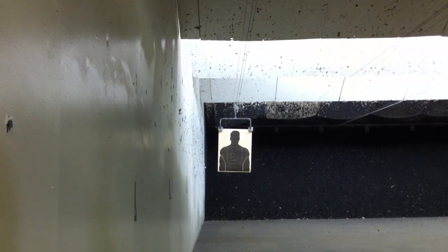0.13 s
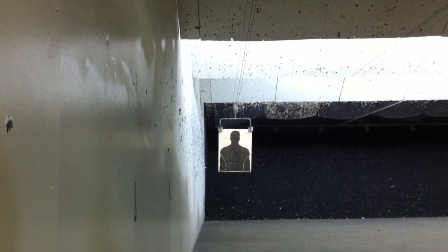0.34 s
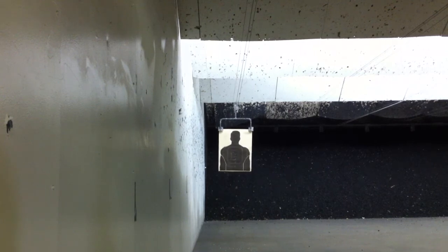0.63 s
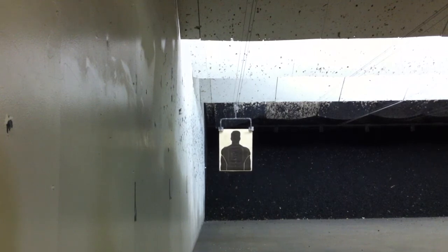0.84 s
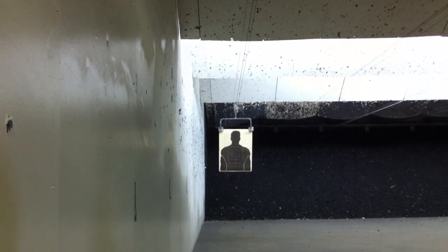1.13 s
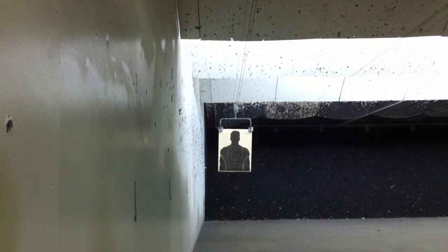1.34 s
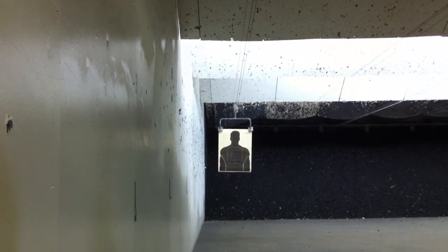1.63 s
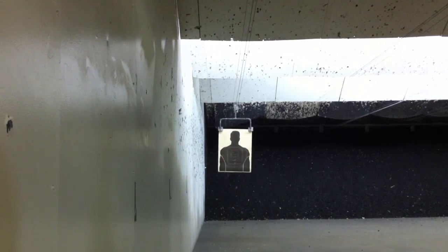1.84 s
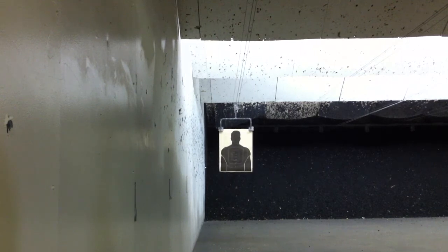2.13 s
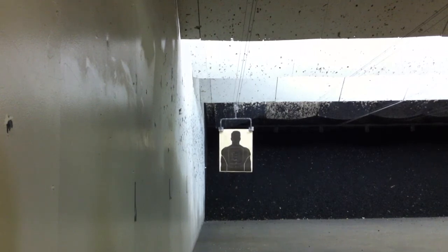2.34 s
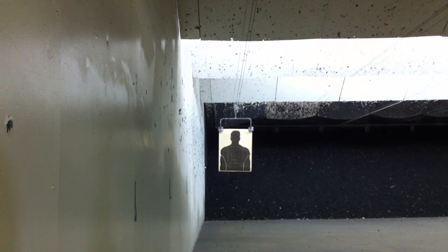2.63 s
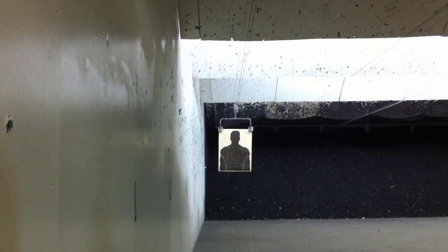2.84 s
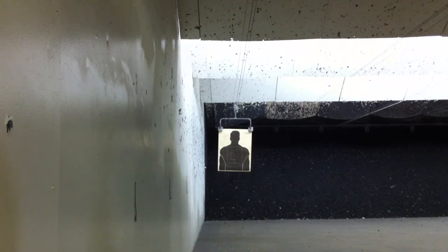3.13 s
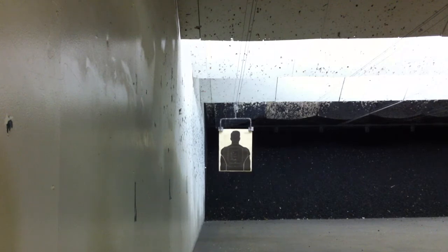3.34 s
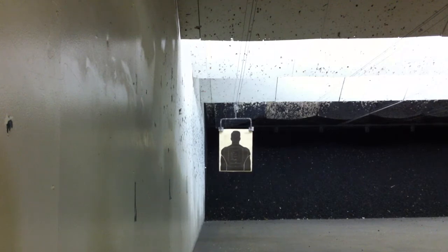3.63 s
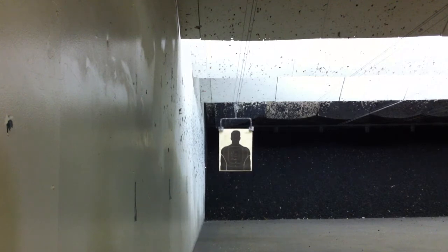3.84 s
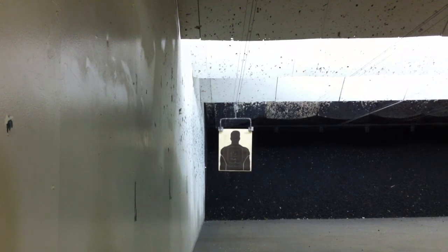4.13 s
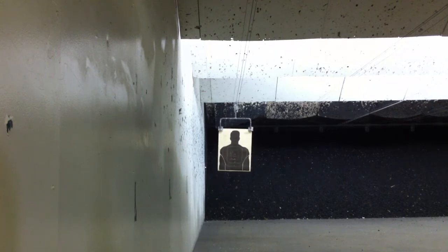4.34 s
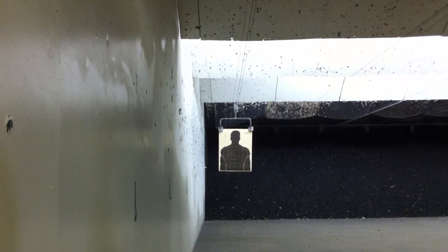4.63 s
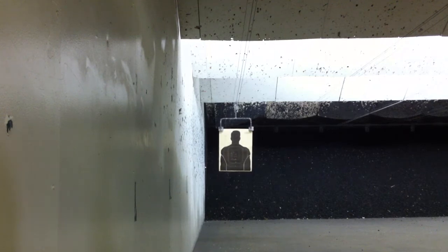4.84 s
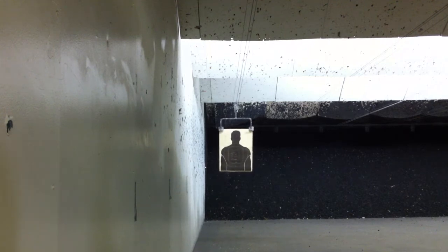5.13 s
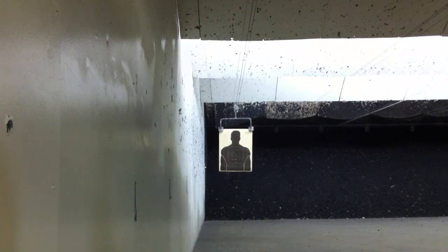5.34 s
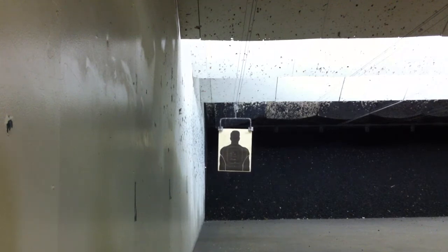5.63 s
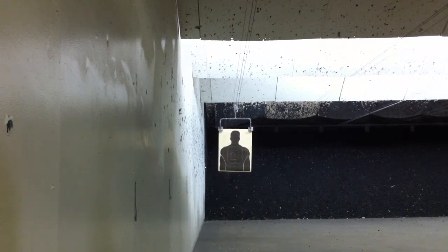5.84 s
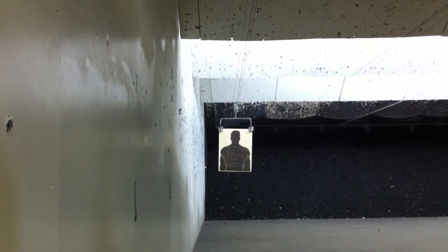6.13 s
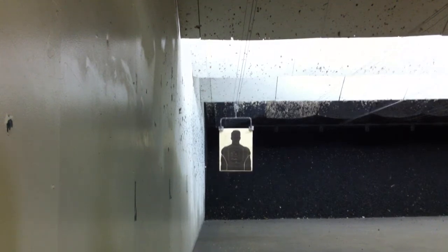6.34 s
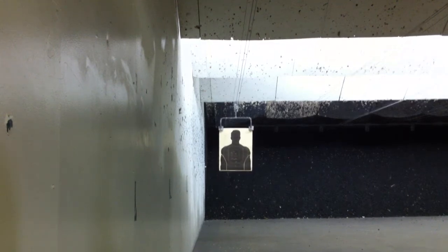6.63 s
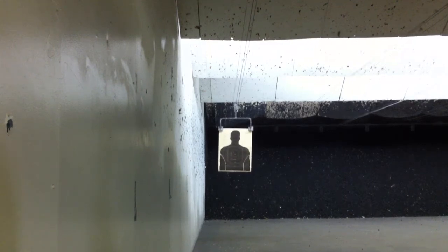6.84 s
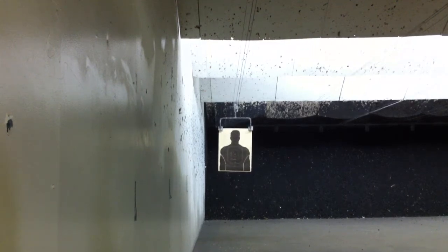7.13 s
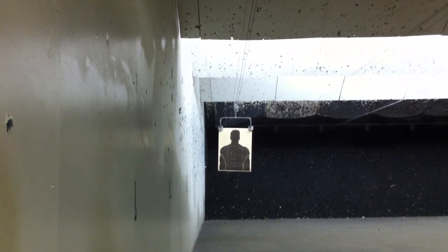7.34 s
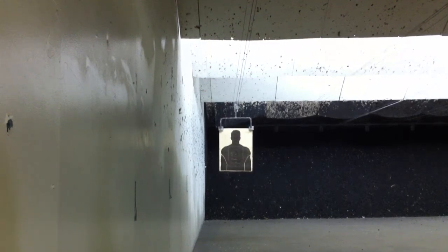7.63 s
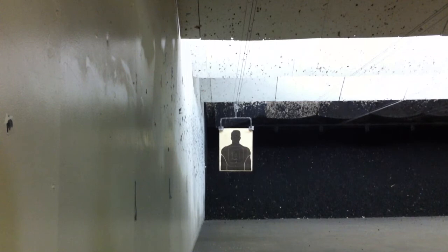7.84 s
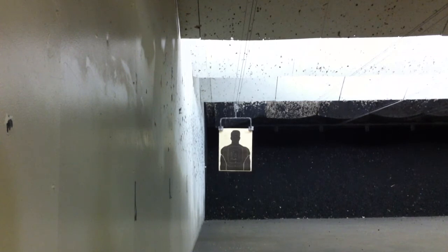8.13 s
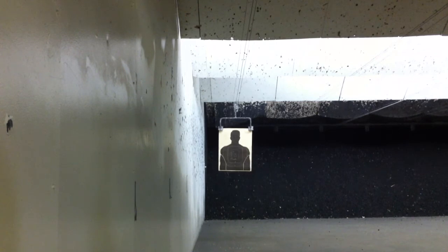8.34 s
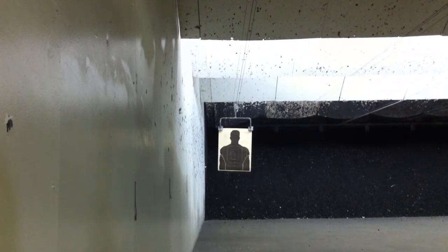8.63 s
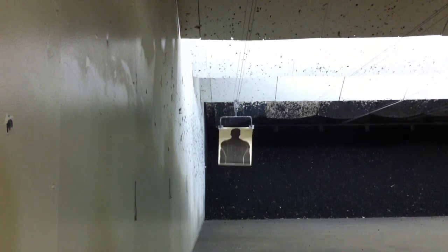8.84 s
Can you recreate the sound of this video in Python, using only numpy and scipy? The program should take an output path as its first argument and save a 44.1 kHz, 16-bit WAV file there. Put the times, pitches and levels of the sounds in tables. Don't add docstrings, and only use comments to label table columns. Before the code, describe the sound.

Inside a concrete shooting range, close to the shooter, the echo of an earlier shot is still ringing. Three spaced pistol blasts follow, each distorting the microphone and leaving a long fluttering tail. Brass cases bounce and roll on the floor. A sleeve brushes, the pistol thumps and rattles onto a wooden bench, a panel is knocked, and a target carrier rolls along its rail over droning ventilation.

```python
import sys
import numpy as np
from scipy import signal
from scipy.fft import rfft, irfft, next_fast_len
from scipy.io import wavfile

SR = 44100
rng = np.random.default_rng(int(sys.argv[2]) if len(sys.argv) > 2 else 0)


def voltage_ratio(level):
    return 10 ** (np.asarray(level, float) / 20)


def store_wav(level_fs):
    pcm = np.round(np.clip(np.atleast_2d(level_fs), -1, 1) * 32767)
    wavfile.write(sys.argv[1], SR, pcm.T.astype(np.int16))


N = 396892

SHOT_TIMES = [
    -1.5,
    .2862,
    2.0127,
    3.7576,
]
BLAST_DB, BLAST_FILL_S = 1, 0.0044
TAIL_SAMPLES = 4 * SR


def rms_one(x):
    return x / np.sqrt(np.mean(x ** 2) + 1e-20)


def at_hz(points, hz):
    table = np.array(points)
    return [np.interp(np.log(hz), np.log(table[:, 0]), column) for column in table[:, 1:].T]


def band(x, low_hz, high_hz, order=2):
    edges = [low_hz, min(high_hz, SR / 2.2)]
    return signal.sosfilt(signal.butter(order, edges, "band", fs=SR, output="sos"), x)


def coloured(spectrum):
    size = next_fast_len(N)
    hz = np.arange(1, size // 2 + 2) * SR / size
    shaped = rfft(rng.standard_normal(size)) * voltage_ratio(at_hz(spectrum, hz)[0])
    return rms_one(irfft(shaped, size)[:N])


def drift(per_s):
    count = int(N / SR * 200) + 2
    chance = rng.standard_normal(count + 400)
    slow = signal.lfilter([1], [1, -np.exp(-np.pi * per_s / 100)], chance)[400:]
    return np.interp(np.arange(N) / SR * 200, np.arange(count), rms_one(slow))


def add(out, s, x):
    at = int(round(s * SR))
    x = x[max(-at, 0):N - at]
    out[max(at, 0):max(at, 0) + len(x)] += x


def ring(hz, t60):
    t = np.arange(int(t60 * SR) + 8) / SR
    return np.sin(2 * np.pi * hz * t) * voltage_ratio(-60 * t / t60)


def crack(low_hz, high_hz, t60):
    t = np.arange(int(.25 * SR)) / SR
    puff = band(rng.standard_normal(len(t)) * voltage_ratio(-60 * t / t60), low_hz, high_hz)
    return puff / np.abs(puff).max()


def wavering(hz, seconds, width_hz):
    noise = band(rng.standard_normal(SR + SR // 4), hz - width_hz / 2, hz + width_hz / 2)
    settled = noise[SR // 4:]
    return rms_one(settled[:int(seconds * SR)])


def stroke(start_s, peak_s, end_s, peak_db, rise, fall):
    t = np.arange(N) / SR
    below_peak_db = np.maximum(rise * (peak_s - t), fall * (t - peak_s))
    return voltage_ratio(peak_db - below_peak_db) * (t >= start_s) * (t < end_s)


def hall(white):
    # frequency in Hz, start level in dB per Hz, early t60 in seconds,
    # late share in dB, late t60 in seconds.
    reverberation = [(131, -30, 0.29, -25.5, 1.1), (212, -6, 0.69, -24, 3.6), (333, -5, 1.67, -8.5, 1.5),
                     (477, 1.5, 1.5, -17.5, 2.6), (752, 5, 1.73, -5.5, 1.9), (1097, -1, 1.75, -4.5, 1.9),
                     (1970, -4.5, 0.82, -6, 1.76), (2570, -5.5, 1.51, -9.5, 2.12),
                     (3810, -7.5, .8, -10, 1.56), (5740, -13, 0.98, -5, 0.81), (8100, -11, 0.43, -7, 0.67),
                     (12040, -14, 0.24, -4, .38), (16000, -10.5, 0.28, -3, .28)]
    fill_cycles = 17
    t, blast, even = np.arange(white.shape[1]) / SR, 0, 0
    edges = 100 * 2 ** np.arange(0, 7.6, 1 / 4)
    for k, (low, high) in enumerate(zip(edges, edges[1:])):
        hz = np.sqrt(low * high)
        level_db, early, late_db, late = at_hz(reverberation, hz)
        noise = band(white[k % 2], low, high, order=3)
        fill = 1 - np.exp(-(t / (BLAST_FILL_S + fill_cycles / hz)) ** 1.3)
        decay = np.sqrt(voltage_ratio(-120 * t / early) + voltage_ratio(2 * late_db - 120 * t / late))
        blast = blast + voltage_ratio(level_db) * fill * decay * noise
        even = even + noise[:2 * SR] * voltage_ratio(-60 * t[:2 * SR] / (0.15 + .5 * late))
    return blast / np.sqrt(np.mean(blast[:SR // 5] ** 2)), even


def standing_waves(size):
    # frequency in Hz, level in dB, t60 in seconds.
    hall_modes = [(442.8, -6.5, 1.9), (509.5, 2.5, 2.47), (552, -13, 2.1), (588, -6.5, 2.9),
                  (646, -0.5, 2.2), (716.4, -7.5, 0.87), (708, -2, 2.1), (771, -7.5, 1.3), (830, -8.5, 2.6),
                  (868, -4.5, 1.4), (919, -10.5, 2.6), (955, -3.5, 0.93), (969, -9, 0.99), (1131, -9, 0.7)]
    t, waves = np.arange(size) / SR, 0
    for hz, db, t60 in hall_modes:
        decay = voltage_ratio(db - 60 * (t - .44) / np.clip(t60, 1.5, 4.5))
        waves = waves + decay * np.sin(2 * np.pi * hz * t + rng.uniform(0, 2 * np.pi))
    return voltage_ratio(-21) * waves * (1 - np.exp(-(t / .07) ** 2))


def boom(size):
    # frequency in Hz, level in dB per Hz.
    boom_colour = [(20, -8), (40, -12), (75, -30), (125, -5.5), (170, -0.9), (260, 0.5), (340, -8.5),
                   (500, -40.5)]
    level_db, start_db, rise_s = -21.5, -18, 0.04
    shut_s, fall_db_per_s = 0.269, 400
    t = np.arange(size) / SR
    db = level_db + start_db * np.exp(-t / rise_s) - fall_db_per_s * np.maximum(t - shut_s, 0)
    return coloured(boom_colour)[:size] * voltage_ratio(db - BLAST_DB)


def flutter(size):
    round_trips_hz, strongest_order, slope_db = 73.0, 35.5, 1
    t60, swell_s, swell_width_s, swell_db = 2.2, .8, 0.21, 6.5
    t, lines = np.arange(size) / SR, 0
    for order in range(31, 39):
        phase = rng.uniform(0, 2 * np.pi)
        line = np.sin(2 * np.pi * order * round_trips_hz * t + phase)
        lines = lines + voltage_ratio(-slope_db * abs(order - strongest_order)) * line
    swell = swell_db * np.exp(-((t - swell_s) / swell_width_s) ** 2)
    return lines * voltage_ratio(swell - 60 * (t - .44) / t60) * (1 - np.exp(-(t / 0.063) ** 2))


def shots(answer, walls):
    charges = [-2.5, -1, -0.8, -0.3]
    wall_levels = [-36, -37.5, -34, -34]
    scatter_times = [.4, .42, .3, 0.68]
    out, t = np.zeros(N), np.arange(SR) / SR
    for s, charge_db, walls_db, t60 in zip(SHOT_TIMES, charges, wall_levels, scatter_times):
        add(out, s, voltage_ratio(BLAST_DB + charge_db) * answer + voltage_ratio(walls_db) * walls)
        scatter = rms_one(band(rng.standard_normal(len(t)), 1300, 8200)) * np.minimum(t / BLAST_FILL_S, 1)
        add(out, s, voltage_ratio(BLAST_DB - 60 * t / t60) * 0.34 * scatter)
    return out


def ventilation():
    # frequency in Hz, level in dB per Hz.
    air_colour = [(18, -67), (30, -46.5), (118, -14.5), (158, -3.5), (248, -18.5), (283, -8), (399, -16.5),
                  (493, -13.5), (676, -19), (772, -13.5), (928, -27.5), (1090, -22.5), (4070, -36.5),
                  (14800, -49), (16500, -55)]
    duct_hz, half_width_hz = 158.5, 7.4
    air = voltage_ratio(-51 + .7 * drift(6)) * coloured(air_colour)
    duct = rms_one(band(rng.standard_normal(N), duct_hz - half_width_hz, duct_hz + half_width_hz))
    hiss = voltage_ratio(-80) * rms_one(band(rng.standard_normal(N), 8000, 15800))
    duck_db, recover_s = 23, 0.81
    t = np.arange(N) / SR
    since_shot = np.min([np.where(t >= s, t - s, np.inf) for s in SHOT_TIMES], axis=0)
    ducking = voltage_ratio(-duck_db * np.exp(-(since_shot / recover_s) ** 2))
    return ducking * voltage_ratio(2.5) * (air + voltage_ratio(-55.5) * duct + hiss)


def cases():
    # time in seconds, peak in dB, ring in dB,
    # floor click in Hz, bright edge in dB.
    first_case = [
        (0.0484, -34, -19, 5216, -7),
        (0.073, -35, -15.5, 5360, -7),
        (0.2194, -39, -19.5, 5050, -7),
        (1.031, -18.5, -26, 7000, -1),
        (1.0592, -19.5, -18.5, 4300, -5),
        (1.6056, -24, -13.5, 4320, -5),
        (1.727, -27, -14.5, 4600, -11),
        (1.984, -30, -16, 6000, -3),
    ]
    second_case = [
        (2.8968, -36, -18, 5100, -9),
        (3.2485, -32, -24, 5300, -11),
        (3.3517, -24, -19, 4650, -11),
        (3.4025, -30, -14, 2930, -7),
        (3.6596, -42.5, -15, 3000, -10),
    ]
    third_case = [
        (4.5302, -18, -40, 4740, -6),
        (4.6877, -23, -40, 5260, -12),
        (5.016, -35.5, -31, 6400, -6),
        (5.1672, -36, -23, 5500, -6),
    ]
    case_pitches = [10820, 11220, 10800]
    # (frequency in Hz, level in dB).
    rolls = [(.05, .24, [(10830, -60)]), (.93, .32, [(14050, -72)]), (2.3, .5, [(10830, -70)]),
             (3.58, 0.16, [(11230, -57)]), (4.2, .32, [(7300, -62), (14100, -71)]),
             (4.27, .63, [(7900, -70), (10700, -63.5), (11000, -73.5), (11900, -75)]),
             (4.85, 0.22, [(6514, -63)]), (5.22, 0.186, [(6514, -60.5), (7920, -64), (10830, -57.5),
             (13910, -71)]), (5.66, .64, [(7740, -65.5), (11800, -79)]), (6.38, 0.21, [(7740, -49.5),
             (11920, -68)]), (6.62, .38, [(7740, -79)])]
    t60, width_hz, overtone_ratio, overtone_db = 0.26, 130, 1.295, -37
    out, t = np.zeros(N), np.arange(SR) / SR
    dying = voltage_ratio(-60 * t[:SR // 2] / t60)
    for touches, hz in zip([first_case, second_case, third_case], case_pitches):
        for s, db, ring_db, click_hz, edge_db in touches:
            add(out, s, voltage_ratio(db + edge_db) * crack(.7 * click_hz, 18000, .04))
            add(out, s, voltage_ratio(db - 4.0) * crack(.85 * click_hz, 1.2 * click_hz, 0.037))
            add(out, s, voltage_ratio(db + ring_db) * dying * wavering(hz, .5, width_hz))
            add(out, s, voltage_ratio(db + overtone_db) * dying * wavering(hz * overtone_ratio, .5, width_hz))
    for start, length, modes in rolls:
        for hz, db in modes:
            singing = wavering(hz, min(length, 1), 40)
            span = t[:len(singing)]
            fade = np.clip(np.minimum(span, span[-1] - span) / 0.016, 0, 1)
            add(out, start, voltage_ratio(db) * singing * fade)
    return out


def ticks():
    # time in seconds, peak in dB, frequency in Hz, crack in dB.
    taps = [
        (3.3512, -21, 2600, -2),
        (5.7409, -32.5, 3000, -9),
        (5.7733, -42, 2070, -6),
        (5.7964, -45, 2750, -6),
        (5.8925, -43, 2590, -6),
        (6.106, -35.5, 2130, -9),
        (7.7533, -39, 2800, -9.5),
        (8.337, -46, 2560, -6),
        (8.6231, -28.5, 2740, 5),
    ]
    out = np.zeros(N)
    for s, db, hz, crack_db in taps:
        add(out, s, voltage_ratio(db - 1.5) * ring(hz, 0.024))
        add(out, s, voltage_ratio(db + crack_db) * crack(810, 11000, 0.047))
    return out


def skitter():
    skid = dict(start_s=3.355, peak_s=3.396, end_s=3.75, peak_db=-42, rise=40, fall=35)
    # frequency in Hz, level in dB per Hz.
    grit_colour = [(900, -36.5), (1500, -5), (2600, -4), (5200, -9.5), (9000, -18), (13000, -19.5),
                   (16000, -28)]
    return stroke(**skid) * coloured(grit_colour) * voltage_ratio(-0.5)


def sleeve():
    brush = dict(start_s=5.05, peak_s=5.58, end_s=5.75, peak_db=-48, rise=32, fall=80)
    # frequency in Hz, level in dB per Hz.
    cloth_colour = [(1470, -22), (2500, -3), (7890, -8), (9890, -14), (13300, -12), (16000, -18)]
    return stroke(**brush) * coloured(cloth_colour)


def struck_wood(touches, modes, t60, top_hz):
    out = np.zeros(N)
    for s, db, crack_db in touches:
        add(out, s, voltage_ratio(db + crack_db) * crack(330, 4100, 0.066))
        for hz, share_db in modes:
            strength = voltage_ratio(db - 5.5 + share_db + rng.normal(0, 1.4)) * rng.choice([-1, 1])
            add(out, s, strength * ring(hz, t60))
    return band(out, 120, top_hz)


def pistol_on_bench():
    # time in seconds, peak in dB, crack in dB.
    thuds = [
        (6.308, -12, -23),
        (6.315, -10.5, -2),
        (6.321, -11, -8),
        (6.333, -13.5, -8),
        (6.463, -16, -4.5),
        (6.471, -14.5, -6),
        (6.481, -21, 4),
        (6.559, -48, -10),
    ]
    # frequency in Hz, share in dB.
    bench_modes = [(200, -3.5), (250, 4), (330, -8), (400, 0.5), (512, -1), (695, -8.5), (836, -8),
                   (1070, -10.5), (1350, -21)]
    return struck_wood(thuds, bench_modes, 0.056, top_hz=11000)


def rattle():
    # start in seconds, count of touches, gap in seconds,
    # first peak in dB, loss per touch in dB.
    runs = [
        dict(s=6.3111, count=14, gap_s=.01076, db=-15, loss_db=0.96),
        dict(s=6.4655, count=4, gap_s=.0101, db=-28, loss_db=0.5),
        dict(s=6.579, count=2, gap_s=.0109, db=-39, loss_db=-9),
        dict(s=6.6109, count=4, gap_s=.0108, db=-24, loss_db=1),
        dict(s=6.6648, count=3, gap_s=0.013, db=-26.5, loss_db=2),
        dict(s=6.7096, count=2, gap_s=.023, db=-29.5, loss_db=4.5),
        dict(s=6.788, count=1, gap_s=0, db=-39.5, loss_db=0),
    ]
    # frequency in Hz, share in dB, t60 in seconds.
    part_modes = [(2040, -22, 0.091), (2420, -11, 0.08), (2900, -6.5, 0.047), (3451, -9, 0.16),
                  (4460, -1, 0.032), (4970, 2, 0.026), (5860, -10, 0.016), (6730, -1.5, 0.025),
                  (7600, -10, 0.022), (10630, -32, 0.013), (12800, -18, .012), (14100, -8, .02)]
    out = np.zeros(N)
    for run in runs:
        for k in range(run["count"]):
            s = run["s"] + k * run["gap_s"]
            db = run["db"] - k * run["loss_db"]
            add(out, s, voltage_ratio(db - 5.0) * crack(2300, 10600, 0.067))
            for hz, share_db, t60 in part_modes:
                shift, spread = rng.normal(size=2)
                mode = ring(hz * (1 + .018 * shift), t60 * 1.25)
                add(out, s, voltage_ratio(db - 9 + share_db + 3.9 * spread) * mode)
    return out


def booth_knocks():
    # time in seconds, peak in dB, crack in dB.
    knocks = [
        (7.892, -21.5, -17),
        (7.904, -28.5, -2.5),
        (7.924, -34, -0.5),
    ]
    # frequency in Hz, share in dB.
    wall_modes = [(290, -3.5), (345, 0.5), (420, -5.5), (620, -8), (770, -8.5), (980, -6), (1250, -9),
                  (1600, -11), (2100, -22)]
    return struck_wood(knocks, wall_modes, 0.049, top_hz=3520)


def target_carrier():
    jolt = dict(start_s=8.63, peak_s=8.635, end_s=8.69, peak_db=-35, rise=50, fall=250)
    rolling = dict(start_s=8.69, peak_s=8.978, end_s=9.1, peak_db=-31.5, rise=32.4, fall=60)
    # frequency in Hz, level in dB per Hz.
    rail_colour = [(71, -44), (120, -13), (167, 1.5), (213, -9), (402, -7), (473, -21), (524, 3.5),
                   (643, -12), (757, 0.5), (839, -11), (892, -7), (1430, -12), (2430, -7.5), (4320, -18),
                   (16000, -34.5)]
    return (stroke(**jolt) + stroke(**rolling)) * coloured(rail_colour) * voltage_ratio(1.2 * drift(60))


def scene():
    blast, even = hall(rng.standard_normal((2, TAIL_SAMPLES)))
    answer = blast + standing_waves(TAIL_SAMPLES) + voltage_ratio(4.5) * boom(TAIL_SAMPLES)
    firing = shots(answer, flutter(TAIL_SAMPLES))
    background = ventilation()
    brass = cases()
    near = ticks() + pistol_on_bench() + rattle()
    rubbing = skitter() + sleeve()
    knock = booth_knocks()
    into_hall = voltage_ratio(-31) * brass + voltage_ratio(-34) * knock + voltage_ratio(-50) * near
    echoes = signal.fftconvolve(into_hall, even)[:N]
    mix = firing + brass + knock + near + echoes + rubbing + target_carrier() + background
    return mix[None]


def top_cut(x):
    return signal.sosfilt(signal.butter(12, 16820, fs=SR, output="sos"), x)


def record(dry):
    top, knee = .74, 9.1
    x = dry / (1 + np.abs(dry / top) ** knee) ** (1 / knee)
    dull = signal.sosfilt(signal.butter(1, 4000, fs=SR, output="sos"), x)
    x = 0.6 * x + 0.19 * dull
    turn = np.exp(-2 * np.pi * 160 / SR)
    x = signal.lfilter([turn, -1], [1, -turn], x)
    x = signal.sosfilt(signal.butter(2, 80, "high", fs=SR, output="sos"), x)
    x = x / (1 + np.abs(x / .93) ** 8) ** (1 / 8)
    x = signal.sosfilt(signal.cheby2(14, 80, 16800, fs=SR, output="sos"), x)
    return top_cut(x)


dry = scene()
out = record(dry)
store_wav(out)
```